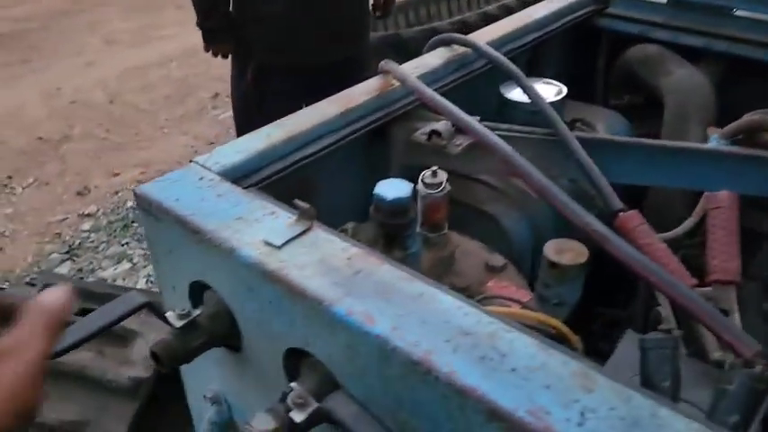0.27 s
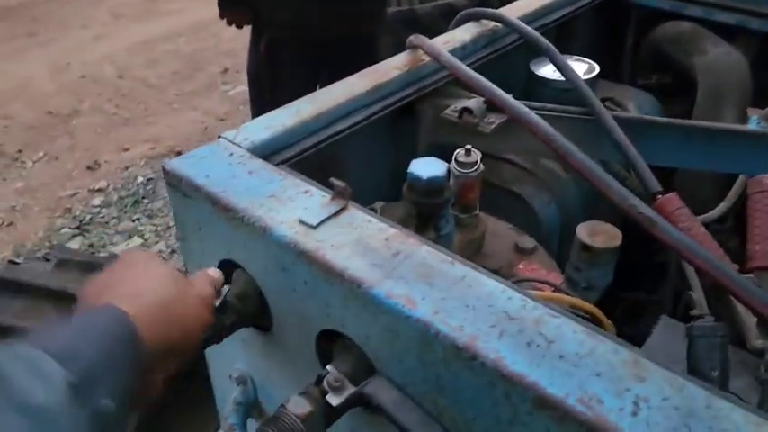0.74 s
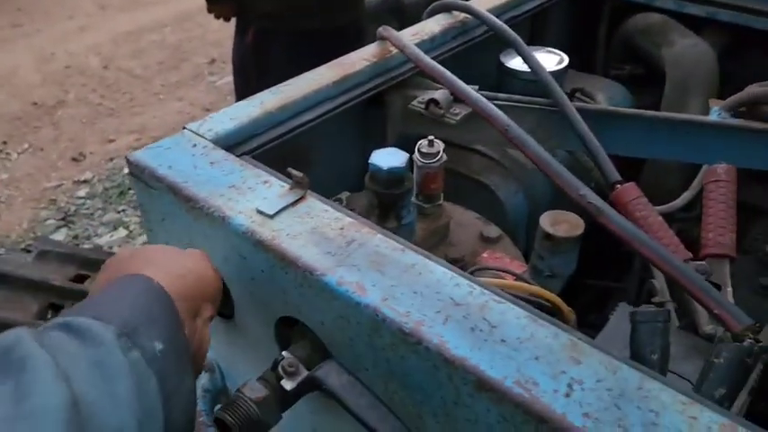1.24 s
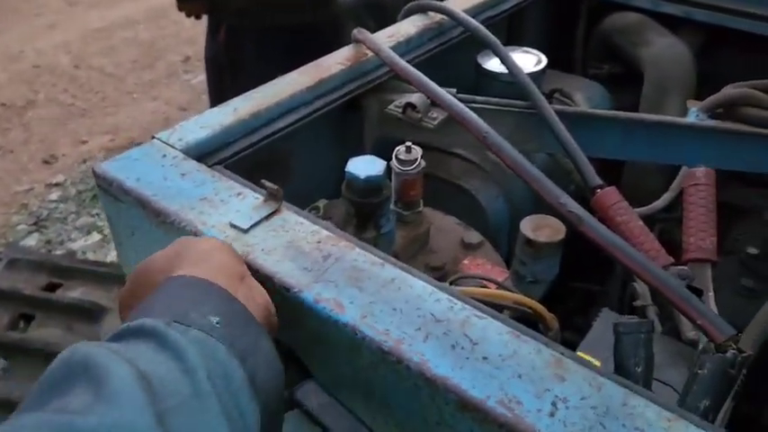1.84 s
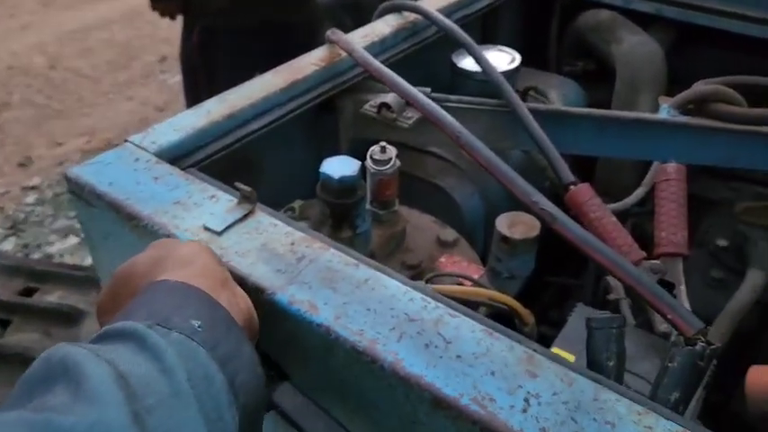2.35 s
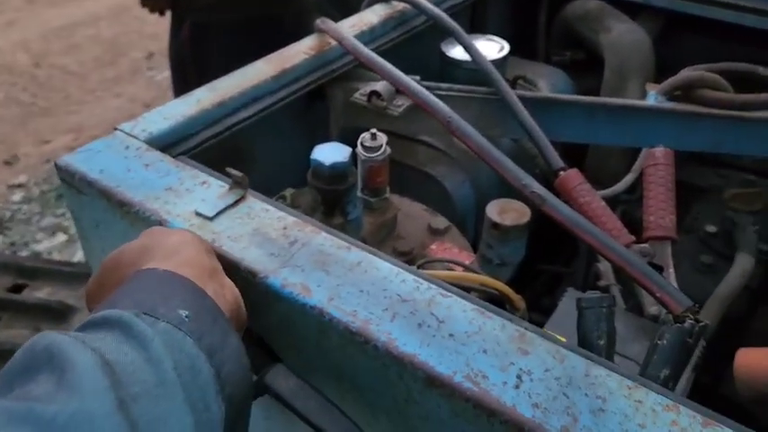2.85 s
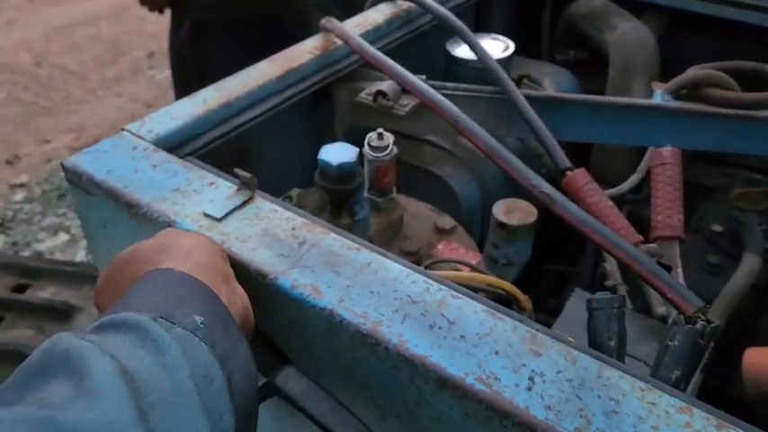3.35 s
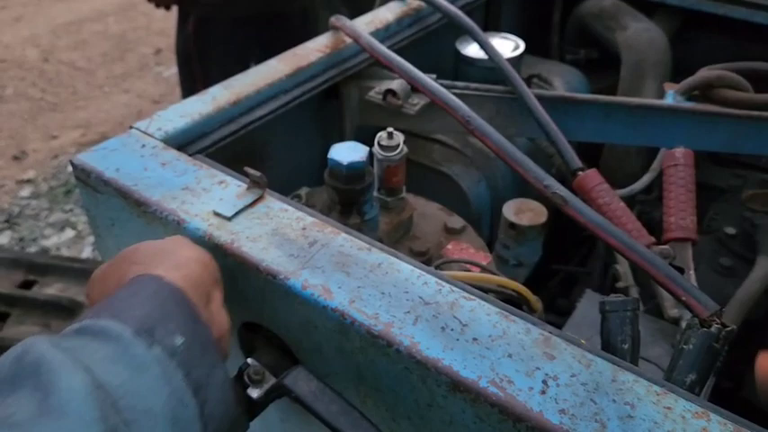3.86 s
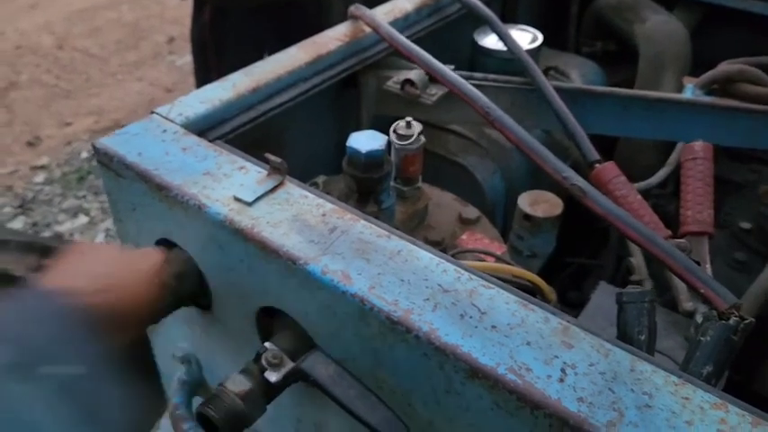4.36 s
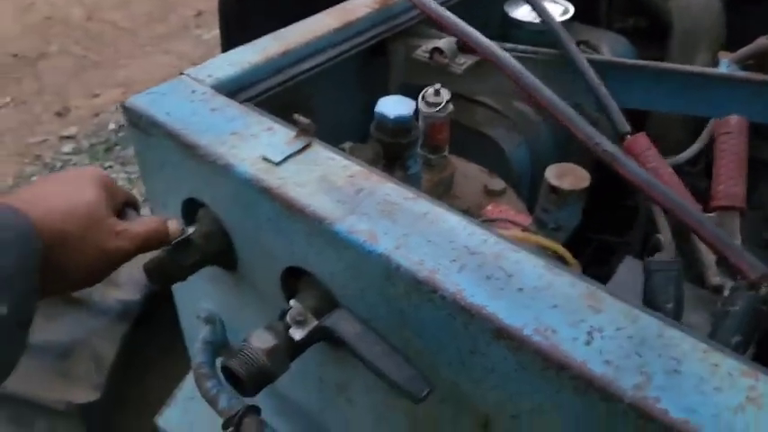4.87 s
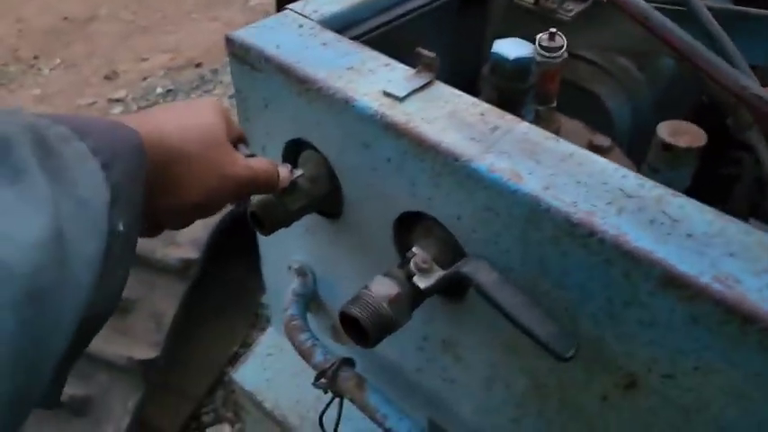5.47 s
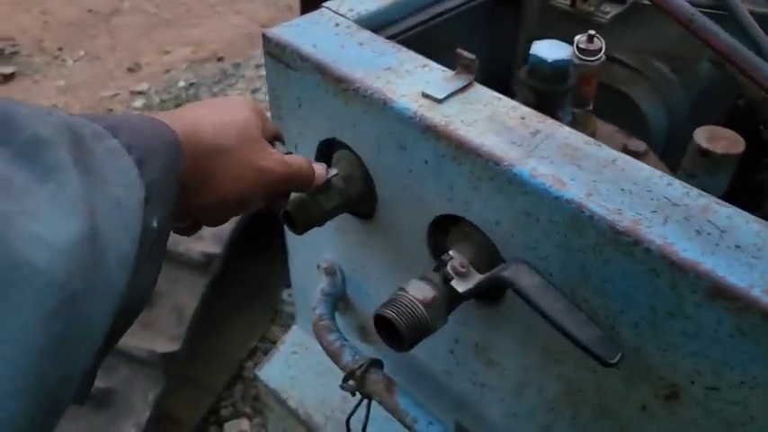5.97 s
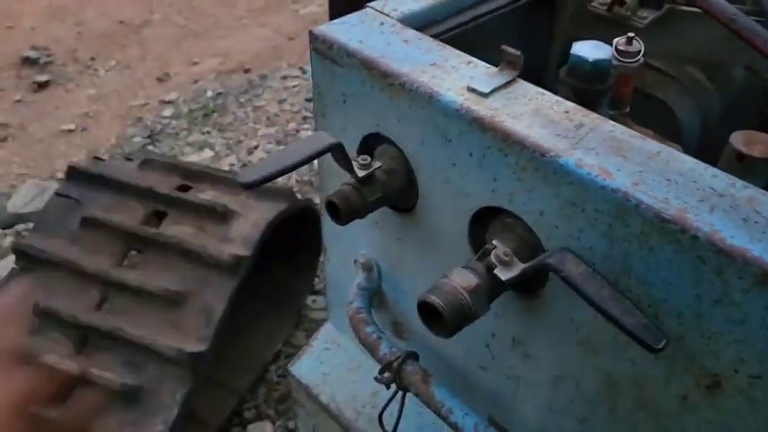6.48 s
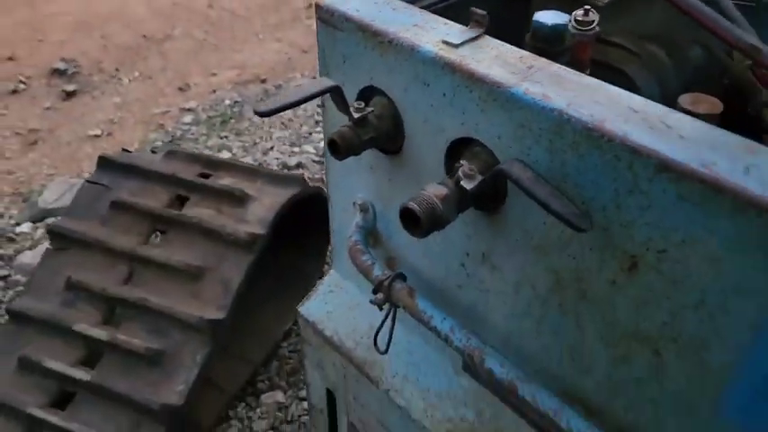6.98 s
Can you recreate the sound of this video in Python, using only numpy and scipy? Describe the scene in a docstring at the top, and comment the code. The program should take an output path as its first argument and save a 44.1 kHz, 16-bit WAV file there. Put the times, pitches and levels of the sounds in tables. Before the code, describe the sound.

A three-cylinder diesel drones through a ringing exhaust, with loud air hissing from an outlet and thumping over the nearby stereo microphone. The hiss closes off, leaving the motor sagging towards a stall amid rhythmic spurts of relief air. Air bursts out again with rasps and brief gliding tones, narrowing to a high wavering whistle as the engine revs back up outdoors.

```python
"""A three-cylinder diesel drives a portable air compressor, close by, while a hand works its outlet valve.
Each firing puffs through a ringing exhaust pipe; panels, housing and block add noise that swells with it.
Air rushes out as coloured noise; the valve shuts, the engine sags and a relief valve spits with each stroke.
The valve opens again and blasts the microphone with thumps and rasps, among short gliding tones.
Then it whistles half shut, a wavering tone in a breathy band, while the engine picks up."""
import sys
import numpy as np
from scipy import signal
from scipy.fft import rfft, irfft, next_fast_len
from scipy.io import wavfile
from scipy.ndimage import uniform_filter1d, map_coordinates

SR = 44100
rng = np.random.default_rng(int(sys.argv[2]) if len(sys.argv) > 2 else 0)


def master(y):
    """Save y as 16-bit WAV."""
    cut = np.clip(np.atleast_2d(y).T, -1, 1)
    pcm = np.round(cut * 32767)  # scale
    wavfile.write(sys.argv[1], SR, pcm.astype(np.int16))


N = 318402

# likeness of the left and right ports in the hiss: f/Hz, likeness/1
AIR_ALIKE = [(300, 0.23), (1300, 0.12), (3000, 0.11), (7000, 0.24), (14000, 0.083)]
# likeness of the two ports in the wind: f/Hz, likeness/1
WIND_ALIKE = [(60, 0.97), (160, 0.39), (300, 0.15), (1000, 0.31)]
# colour of the jet rasping over the microphone: f/Hz, level per Hz/dB
RASP = [(200, -23), (600, 3.5), (1400, 5.5), (2200, 4), (3500, -55), (9000, -40)]
# spells of venting (wide open, opened again, half shut, half shut as the hand lets go):
# opening t/s, shutting t/s, closing time/s, throat level/dB, fizz level at the start/dB
SPELLS = [(-.05, 1.472, 0.075, -22.5, -18), (4.007, 4.976, 0.022, -25.5, -19.5),
          (4.985, 6.54, 0.021, -35, -36.5), (6.53, 11, 0.037, -31, -25)]
STROKES_PER_FIRING = 2 / 3  # compressor strokes
PORTS = np.array([[-.5], [.5]])  # shares a right-minus-left difference between left and right


def amp(db):
    """Amplitude of a level in dB."""
    return 10 ** (np.asarray(db) / 20)


def unit(x):
    """x scaled to rms 1."""
    return x / np.sqrt(np.mean(x ** 2) + 1e-20)


def clock():
    """The time of every sample in s."""
    return np.arange(N) / SR


def along(points, hz):
    """Values read from (Hz, value) points on a log axis."""
    f, v = np.transpose(points)
    return np.interp(np.log(hz + 1), np.log(f + 1), v)


def curves(rows):
    """One value per sample for each column after the time."""
    s, *cols = np.transpose(rows)
    return [np.interp(clock(), s, c) for c in cols]


def steps(rows, glide_s):
    """Each row holds from its start until the next, with a short glide between them."""
    s, *cols = np.transpose(rows)
    row = np.maximum(np.searchsorted(s, clock(), side="right") - 1, 0)
    return [uniform_filter1d(c[row], int(glide_s * SR) + 1, mode="nearest") for c in cols]


def window(start, end, edge):
    """1 between two times, with soft edges; its square has straight ramps."""
    return np.sqrt(np.clip(np.minimum(clock() - start, end - clock()) / edge + .5, 0, 1))


def wobble(rate):
    """A smooth random curve, rate knots a second."""
    return map_coordinates(rng.standard_normal(int(N * rate / SR) + 4), [clock() * rate], order=2)


def filtered(x, response):
    """x times a response of frequency."""
    m = next_fast_len(N + 8192)
    return irfft(rfft(x, m) * response(np.fft.rfftfreq(m, 1 / SR)), m)[..., :N]


def rush(spectrum, alike, lead_s=0):
    """Stereo noise of rms 1 with a given colour, left-right likeness and lead at the left port."""
    def response(hz):
        turn = np.arccos(np.clip(along(alike, hz), -1, 1)) / 2
        return amp(along(spectrum, hz)) * np.array([np.cos(turn), np.sin(turn)])
    mid, side = filtered(rng.standard_normal((2, N)), response)
    right = np.roll(mid - side, int(round(lead_s * SR)))
    return unit(np.array([mid + side, right]))


def narrow(hz, width_hz):
    """A breathy stereo tone of rms 1: a narrow band of noise around a steady or gliding pitch."""
    a, b = filtered(rng.standard_normal((2, 2, N)), lambda f: 1 / (1 + (f / width_hz) ** 2))
    phase = 2 * np.pi * np.cumsum(hz * np.ones(N)) / SR
    return unit(a * np.cos(phase) + b * np.sin(phase))


def speed():
    """Firings a second: the engine runs, coasts down, sags to a crawl and picks up along an S-curve."""
    # coasting down, caught by the governor, then sagging: t/s, firing rate/Hz
    slowing_down = [(1.85, 71.4), (2.1, 70.7), (2.2, 66.5), (2.37, 59.4), (2.75, 35.4), (2.87, 30.2),
                    (3.06, 30.2), (4.04, 19.1)]
    steepest_s, time_constant_s, heads_for_hz = 6.044, .577, 78.9
    slowing, = curves(slowing_down)
    pickup = np.exp(-np.exp((steepest_s - clock()) / time_constant_s))
    return slowing + (heads_for_hz - slowing_down[-1][1]) * pickup


def pipe(hz):
    """Complex response of the exhaust's resonances and the silencer's dead notes."""
    # ringing of exhaust pipe and silencer: f/Hz, width/Hz, level/dB
    resonances = [(54.2, 15.6, 3), (117.4, 9.6, 4.5), (154.4, 14, -4.5), (181.8, 18.4, -3),
                  (212.6, 12, -3.5), (251, 8.9, -3), (283.6, 6, -3.5), (308, 14, -8), (361.5, 31, -6)]
    # dead notes of the silencer: f/Hz, width/Hz, depth/1
    dead_notes = [(87.3, 18, 0.35)]

    def peak(centre, width):
        return 1j * hz * width / (centre * centre - hz * hz + 1j * hz * width)

    # neighbouring resonances have opposite signs
    ringing = sum((-1) ** k * amp(db) * peak(c, w) for k, (c, w, db) in enumerate(resonances))
    return ringing * np.prod([1 - np.clip(depth, 0, 1) * peak(c, w) for c, w, depth in dead_notes], axis=0)


def exhaust(rate, firings, boom_db, puff_db, uneven_db):
    """One puff per firing rings the pipe; a puff lasts a fixed crank angle, so slow running is duller."""
    boom_knee_hz = 53.2  # below this firing rate the boom falls away
    dullest_hz = 147  # the slowest puffs still reach up to here
    grid = np.arange(2048)  # Hz
    # the silencer's chambers delay the higher notes and smear each puff
    response = pipe(grid) * np.exp(-1j * (grid / 130) ** 2)
    turn = np.exp(2j * np.pi * (firings + 0.0022 * wobble(30)))
    puffs, power, partial = np.zeros(N), np.zeros(N), turn
    corner = np.maximum(4.22 * rate, dullest_hz)
    # harmonics of the firing rate; the first is the boom
    for k in range(2, 18):
        partial = partial * turn
        gain = response[(k * rate).astype(int)] / (1 + (k * rate / corner) ** 5.1)
        puffs += (gain * partial).real
        power += abs(gain) ** 2
    # the three cylinders are not equally strong
    uneven = amp(uneven_db * np.cos(np.pi * firings * STROKES_PER_FIRING) + 0.45 * wobble(35))
    radiated = 1 / np.sqrt(1 + (boom_knee_hz / rate) ** 8)
    boom_level = radiated * amp(boom_db + 0.22 * wobble(18.0))
    boom = boom_level * np.sqrt(2) * (turn * np.exp(1j * 0.27)).real
    return amp(puff_db) * uneven * puffs / np.sqrt(power / 2) + boom


def casing(rate, firings, rumble_db, shudder_db, clatter_db):
    """Panels rumble, housing shudders, block clatters: noise swelling at each firing, deepest when slow."""
    # colours of panels, loose housing and block: f/Hz, level per Hz/dB
    panel_colour, housing_colour, block_colour = [(20, -30), (36, -11), (55, 1), (100, -1), (190, 0.5),
                                                  (300, -4), (400, -2.5), (520, -16.5), (900, -18.5),
                                                  (2000, -58)], [(25, -25), (55, -0.5), (100, 1.5),
                                                                  (140, -3.5), (190, -5), (250, -7.5),
                                                                  (450, -23.5), (900, -55)], [(200, -33), (440, 1),
                                                                                   (500, -23), (550, 1),
                                                                                   (610, -4), (700, -3.5),
                                                                                   (820, 6), (880, -3.5),
                                                                                   (940, 2.5), (1100, -2),
                                                                                   (1500, -7.5),
                                                                                   (2100, -10.5),
                                                                                   (4200, -14.5),
                                                                                   (14000, -20.5)]
    # likeness of the two ports: f/Hz, likeness/1
    engine_alike = [(60, 0.76), (150, 0.95), (300, 0.99), (700, 0.85), (1500, 0.13), (4000, 0.062)]
    beat = np.cos(2 * np.pi * (firings - .1)) * np.interp(rate, [25, 65], [2.2, 1])
    rumble = amp(rumble_db) * unit(amp(0.62 * beat) * rush(panel_colour, engine_alike))
    shudder = amp(shudder_db) * unit(amp(0.62 * beat) * rush(housing_colour, engine_alike))
    rattle = amp(0.23 * beat + 1.4 * wobble(120))
    clatter = amp(clatter_db) * unit(rattle * rush(block_colour, engine_alike))
    return rumble + shudder + clatter


def jet(throat_db, fizz_db, sizzle_db, spectrum):
    """Escaping air: a roar in the valve's throat and fizz from the free jet, each with its own turbulence."""
    throat_right_db, fizz_right_db = 1, 0.3  # right port minus left
    air = rush(spectrum, AIR_ALIKE, lead_s=.0003)
    throat = filtered(air, lambda hz: 1 / (1 + (hz / 4600) ** 8))
    sizzle = air - filtered(air, lambda hz: 1 / (1 + (hz / 10500) ** 8))
    fizz = (air - throat + (amp(sizzle_db) - 1) * sizzle) / np.std(air - throat)

    def eddies_db():
        return 0.99 * (wobble(250) + 1.48 * wobble(30))

    roar = amp(throat_db + PORTS * throat_right_db + eddies_db()) * unit(throat)
    return roar + amp(fizz_db + PORTS * fizz_right_db + eddies_db()) * fizz


def outlet(rate, strokes):
    """Each spell of venting drains the tank and grows louder with engine speed; the strokes ripple the flow."""
    # air wide open, opened again, half shut, let go: f/Hz, level per Hz/dB
    colours = [[(200, -7), (700, -9.5), (1500, -7.5), (1950, -9.5), (2400, -0.5), (3100, -2.5), (3900, -4),
                (5700, 5), (6600, -2), (7450, 5), (8300, 2), (10700, -0.5), (11800, 5.5), (14200, 2)], [(200, -5), (700, -1), (1500, -2), (1950, -6.5), (2350, 1.5), (3200, 4.5),
                                   (4200, 1), (6000, 0), (6900, -3), (7550, 0.5), (8300, -3.5), (10200, -5),
                                   (12300, 0), (14200, 0)], [(300, -45), (1000, -9), (1500, -5), (1850, -7.5),
                                                       (2350, 4.5), (2700, -0.5), (3200, 2), (4200, -5.5),
                                                       (5400, 8.5), (6900, 0), (7600, 2.5), (8400, 1),
                                                       (10900, -1), (12000, -4)], [(300, -1), (1000, -15),
                                                                              (1500, -1.5), (1850, -5),
                                                                              (2350, 6), (2700, 1.5),
                                                                              (3200, 2), (4200, -15),
                                                                              (5400, 5.5), (6900, -4),
                                                                              (8400, -0.5), (10000, -5.5),
                                                                              (12000, -2.5), (14000, 0)]]
    # the hiss swells as the jet points at the microphone: start t/s, end t/s, edge/s, level/dB
    sweeps = [(0.76, 0.995, 0.08, 2), (4.394, 4.477, 0.014, 8.5)]
    bleed_db_per_s = 0.76  # an open outlet drains the tank
    # a faster engine pumps more air: dB per octave of engine speed
    throat_slope, fizz_slope, sizzle_slope = 5, 8.5, -4
    throat_fade = 0.53  # share of the fizz's closing loss in dB that the throat takes
    t, air = clock(), 0
    for (opens, shuts, closing, throat_db, fizz_db), colour in zip(SPELLS, colours):
        shut_db = -20 / np.log(10) * np.logaddexp(0, 2 * (t - shuts) / closing)
        octaves = np.log2(rate / np.interp(opens, t, rate))
        sizzle_db = sizzle_slope * np.log2(rate / np.interp(shuts, t, rate))
        flow = jet(throat_db + throat_slope * octaves + throat_fade * shut_db,
                   fizz_db + fizz_slope * octaves + shut_db, sizzle_db, colour)
        air = air + window(opens, np.inf, edge=0.0052) * amp(-bleed_db_per_s * (t - opens)) * flow
    aim_db = sum(db * window(start, end, edge) ** 2 for start, end, edge, db in sweeps)
    return amp(aim_db + 0.099 * np.cos(2 * np.pi * strokes)) * air


def swells():
    """Bands of noise swell and slide in the hiss as hand and microphone move about the jet."""
    # start t/s, end t/s, f at start/Hz, f at end/Hz, width/Hz, level/dB
    bands = [(-.05, 0.493, 7430, 7500, 450, -26.5), (0.761, 1.198, 12430, 11800, 695, -28),
             (4.007, 4.39, 3520, 3204, 593, -33), (4.395, 4.47, 4780, 1800, 1000, -25),
             (4.467, 4.714, 2287, 2345, 336, -28), (4.72, 4.921, 1510, 1256, 402, -33)]
    sound = 0
    for start, end, from_hz, to_hz, width_hz, db in bands:
        hz = np.interp(clock(), [start, end], [from_hz, to_hz])
        gate = window(start, end, edge=min(.12, (end - start) / 4))
        sound = sound + amp(db) * gate * narrow(hz, width_hz)
    return sound


def leak():
    """Strength of air at the relief valve while the outlet is shut: it weeps, cracks open, pops and fades."""
    weep_s, weep_width_s, weep_db = 2.19, 0.3, -33.5
    crack_s, lift_s, lift_db, fade_db_per_s = 2.3, 3.001, -22, 3
    crack_share = 0.65  # how far it has opened just before it lifts fully
    pop_db, pop_length_s = 1.5, 0.086
    reseat_db, reseat_s = -4, 0.029  # after the pop it falls back for a moment
    t = clock()
    weep = amp(weep_db) / (1 + ((t - weep_s) / weep_width_s) ** 2)
    spent = lift_s + pop_length_s
    pop = pop_db * window(lift_s, spent, edge=0.011) ** 2
    reseat = reseat_db * window(spent, spent + reseat_s, edge=0.01) ** 2
    cracking = crack_share * np.clip((t - crack_s) / (lift_s - crack_s), 0, 1) ** 1.6
    opening = np.where(t < lift_s, cracking, 1)
    lifted = amp(lift_db + pop + reseat - fade_db_per_s * (t - lift_s)) * opening
    return np.maximum(weep, lifted) * window(SPELLS[0][1], SPELLS[1][0], edge=0.074)


def relief(rate, strokes):
    """Each stroke lifts the relief valve, which chatters on its seat and closes again, now sooner, now later."""
    # slow strokes come as separate spits: firing rate/Hz, share of the leak in spits/1
    spit_shares = [(20, 0.91), (30, 0.45), (55, 0.17)]
    # colour of the relief air: f/Hz, level per Hz/dB
    relief_colour = [(900, -31), (2200, -16.5), (3000, -3), (3900, -12.5), (5000, -4), (5580, -2.5),
                     (5850, 1), (6100, -0.5), (6650, -3), (7250, 2.5), (7580, 6), (8000, -6), (10700, -9),
                     (11800, -5.5), (13900, -3.5)]
    chatter_hz, shuts_at = 84, 0.94  # shuts at about this share of the stroke
    part = strokes % 1
    age = part / (rate * STROKES_PER_FIRING)  # s since the stroke began
    closes = np.minimum(shuts_at + .045 * wobble(17), 1)
    lift = np.minimum(age / .0015, 1) * np.exp(-.85 * part) * np.clip((closes - part) / .2, 0, 1)
    cycle = chatter_hz * age - .2 + 0.48 * part * wobble(40)
    chatter = amp(4.8 * np.cos(2 * np.pi * cycle) + .8 * wobble(90))
    share = np.clip(along(spit_shares, rate), 0, 1)
    flow = 1 - share + share * unit(lift * chatter)
    return leak() * flow * rush(relief_colour, AIR_ALIKE, lead_s=-.00012)


def housing(x):
    """Echoes off nearby steel walls comb the hiss, differently at each port."""
    # delay left/s, delay right/s, gain/1
    walls = [(.0013, 0.0018, 0.093), (.0031, 0.0018, -0.11), (.0052, 0.0066, 0.056), (.0094, 0.0098, 0.011)]

    def response(hz):
        echoes = 0
        for left, right, gain in walls:
            echoes = echoes + gain * np.exp(-2j * np.pi * hz * np.array([[left], [right]]))
        return 1 + echoes

    return filtered(x, response)


def whistle(strokes):
    """Half-shut valve: a stroke-wavered edge tone with a weak octave, in a halo and a wider skirt of noise."""
    # t/s, f/Hz, level/dB, right minus left/dB, phase between the ports/rad
    edge_tone = [(5.0, 5430, -18, 0, 0.72), (5.3, 5310, -24.5, -1, 1.7), (5.5, 5190, -26.5, 0, 2.34),
                 (5.7, 5120, -33, -2, 2.3), (6.0, 5120, -25.5, 1.5, 2.8), (6.35, 5250, -19.5, 9.5, 3.4),
                 (6.63, 5373, -12.5, 7, 2.5), (6.8, 5520, -13, -1, 2.63), (6.98, 5550, -18.5, 5, 1.8),
                 (7.22, 5960, -26, -5, 1.5)]
    # the tone breaks and jumps up: t/s, length/s, jump/Hz, dip/dB
    breaks = [(6.535, 0.03, 19, -11), (6.804, 0.018, 130, -34), (6.995, 0.021, 190, -1)]
    start, chirp_hz, chirp_s = 4.988, 260, 0.00795  # it starts sharp and falls to pitch
    # skirt: width, mean level, share of the tone's swings in dB
    skirt_width_hz, skirt_db, skirt_follows = 220, -38.5, 0.58
    t = clock()
    hz, db, right_db, spread = curves(edge_tone)
    hz = hz + chirp_hz * np.exp(-np.maximum(t - start, 0) / chirp_s)
    for s, length, jump_hz, dip_db in breaks:
        hz = hz + jump_hz * window(s, np.inf, length) ** 2
        db = db + dip_db * window(s - length / 2, s + length / 2, edge=0.0092) ** 2
    ripple = np.cos(2 * np.pi * strokes)
    phase = 2 * np.pi * np.cumsum(hz + 12 * ripple + 13 * wobble(50) + 42 * wobble(500)) / SR
    waver = unit(amp(1.04 * wobble(180) + 2.2 * wobble(25) + 0.65 * ripple))
    tone = waver * np.exp(1j * (phase + PORTS * spread))
    halo = unit(filtered(rng.standard_normal((2, N)), lambda f: 1 / (1 + (f / 170) ** 2)))
    # a strong tone locks in; a weak one is breathier
    airy = np.clip(np.interp(db, [-31, -21, -13], [.55, .08, .03]), 0, 1)
    breath = halo[0] * tone.real + halo[1] * tone.imag
    sound = np.sqrt(2 * (1 - airy)) * tone.real + np.sqrt(airy) * breath
    octave = amp(-21.5) * np.cos(2 * phase) * (0.38 + 0.66 * halo)
    skirt_level = amp(skirt_db + skirt_follows * (db - np.mean(db[t > start])))
    skirt = skirt_level * unit(amp(2.4 * ripple + 4.5 * wobble(90))) * narrow(hz, skirt_width_hz)
    return (amp(db + PORTS * right_db) * (sound + octave) + skirt) * window(start, np.inf, edge=0.0091)


def buffeting():
    """The jet batters the microphone in ragged lumps of noise and rasps over its edge."""
    # the jet strikes the microphone: start t/s, end t/s, thump level/dB, rasp level/dB
    gusts = [(0.803, 0.872, -21, -29), (0.872, 0.939, -17, -27), (0.946, 0.994, -16, -22),
             (1.045, 1.098, -43, -31), (1.076, 1.117, -41, -27), (1.137, 1.188, -27, -25.5),
             (1.226, 1.4, -23, -31.5), (4.255, 4.304, -25.5, -47), (4.289, 4.337, -16, -36),
             (4.36, 4.41, -19, -45), (4.413, 4.443, -35, -44), (4.444, 4.467, -20.5, -19),
             (4.667, 4.708, -46, -29), (6.403, 6.496, -45, -32)]
    # colour of the thumps: f/Hz, level per Hz/dB
    thump_colour = [(25, -14), (100, 10.5), (190, 0.5), (380, -1.5), (600, -7), (1050, -8.5), (1500, -27),
                    (3000, -36), (8000, -55)]
    thump = sum(amp(db) * window(start, end, edge=0.0063) for start, end, db, _ in gusts)
    rasp = sum(amp(db) * window(start, end, edge=0.013) for start, end, _, db in gusts)
    wind = thump * rush(thump_colour, WIND_ALIKE) + rasp * rush(RASP, AIR_ALIKE)
    return unit(amp(1.9 * wobble(200))) * wind


def slaps():
    """Single eddies hit the microphone: a quick push of pressure and a splash of rasp."""
    # t/s, level/dB
    eddy_hits = [(0.878, -14.5), (0.898, -17), (0.908, -5.5), (0.925, -7), (0.967, -10.5), (0.982, -14),
                 (4.294, -4), (4.322, -16), (4.337, -13), (4.398, -26), (4.442, -11), (4.449, -6)]
    push_s, splash_s, splash_db = 0.0016, 0.0026, -11.5  # push length, splash decay and relative level
    t = np.arange(2048) / SR
    push = (1 - t / push_s) * np.exp(-t / push_s) * (1 - np.exp(-t / 0.00029))
    hits = np.zeros(N)
    for s, db in eddy_hits:
        hits[int(s * SR)] = amp(db)
    splash = signal.fftconvolve(hits, np.exp(-t / splash_s))[:N]
    return signal.fftconvolve(hits, push)[:N] + amp(splash_db) * splash * rush(RASP, WIND_ALIKE)


def gliding_tones():
    """Short sines, unsteady in pitch, glide up or down around the gusts."""
    # t/s, length/s, f/Hz, level/dB, relative rise of pitch/(1/s)
    glides = [(1.047, 0.028, 300, -34, -10), (1.048, 0.038, 580, -37, -3), (1.049, 0.027, 1160, -36, -3),
              (4.305, 0.044, 1040, -25, 1), (4.325, 0.039, 188, -20.5, 1), (4.328, .06, 365, -27.5, -0.5),
              (4.363, 0.031, 1000, -30, 2), (4.513, 0.02, 300, -28.5, -2), (4.516, 0.023, 680, -36, -1),
              (4.571, 0.038, 178, -30, -2), (4.65, 0.027, 310, -33, 3), (4.677, 0.015, 545, -28, 7),
              (4.688, 0.029, 1310, -28, 1), (4.702, 0.022, 1900, -29, 4)]
    unsteady, tones = clock() + np.cumsum(0.051 * wobble(150)) / SR, 0
    for s, length, hz, db, rise in glides:
        phase = 2 * np.pi * hz * (unsteady + rise * (clock() - s) ** 2 / 2)
        gate = window(s - length / 2, s + length / 2, edge=0.0166)
        tones = tones + amp(db) * gate * np.sin(phase)
    return np.sqrt(2) * tones


def low_end_dips(x):
    """The low end of engine and air dips briefly: a low-passed copy is partly taken away."""
    # start t/s, end t/s, level/dB, reaching up to f/Hz
    dips = [(0.833, 1.388, -7, 254), (0.997, 1.075, -9, 1490), (1.094, 1.159, -19, 746),
            (1.176, 1.225, -11, 700), (4.475, 4.54, -9.5, 1060), (4.546, 4.712, -4.5, 300),
            (4.684, 4.798, -9, 700), (4.8, 4.875, -5, 300)]
    for start, end, db, top_hz in dips:
        low = signal.sosfiltfilt(signal.butter(2, top_hz, fs=SR, output="sos"), x)
        x = x + (amp(db) - 1) * window(start, end, edge=0.013) ** 2 * low
    return x


def singing():
    """Weak flow makes the valves sing faintly: narrow bands of noise."""
    # start t/s, end t/s, f/Hz, width/Hz, level/dB
    faint_tones = [(1.72, 2.2, 5673, 75, -46.5), (5.682, 5.981, 4970, 83.33, -38)]
    return sum(amp(db) * window(start, end, edge=0.2) * narrow(hz, width_hz)
               for start, end, hz, width_hz, db in faint_tones)


def scene():
    """The crankshaft times the firings and the compressor's strokes; the jet and its wind join the engine."""
    # engine running free, pumping against the shut valve, throttling back, coasting, caught by the
    # governor, labouring, chugging, sinking, near stalling, stumbling, picking up, gathering speed, back:
    # start t/s, boom level/dB, exhaust puffs level/dB, panel rumble level/dB, shudder level/dB,
    # block clatter level/dB, unevenness of the cylinders/dB
    states = [(0, -17.5, -26, -30, -38.5, -51, 0.2), (1.5, -18.5, -26.5, -29.5, -43.5, -34.5, 0.5),
              (2.18, -22, -23, -28.5, -44, -32.5, -2), (2.47, -15.5, -30, -33, -36, -37, 0),
              (2.88, -22, -18.5, -33.5, -37, -35.5, -0.5), (3.34, -18, -22, -32.5, -35, -34, 0.5),
              (3.78, -22, -20.5, -32.5, -38, -34.5, -0.5), (4.08, -22, -24, -35.5, -28.5, -54, 0),
              (4.47, -22, -37, -34, -30.5, -43, -5), (5.27, -22, -33.5, -29.5, -28, -40, 1),
              (5.62, -25, -22.5, -40.5, -28.5, -44.5, 3), (6.15, -24.5, -24, -33.5, -27.5, -41, 1.5),
              (6.7, -19, -26, -34.5, -35, -39, 0)]
    stroke_at_s = 3.5  # a stroke begins here
    puff_lag = 0.149  # each puff reaches the tailpipe this share of a firing late
    rate = speed()
    firings = np.cumsum(rate) / SR
    firings = firings - np.interp(stroke_at_s, clock(), firings)
    strokes = firings * STROKES_PER_FIRING
    boom_db, puff_db, rumble_db, shudder_db, clatter_db, uneven_db = steps(states, glide_s=0.2)
    late = firings - puff_lag
    engine = exhaust(rate, late, boom_db, puff_db, uneven_db)
    engine = engine + casing(rate, late, rumble_db, shudder_db, clatter_db)
    air = housing(outlet(rate, strokes) + swells() + relief(rate, strokes))
    at_microphone = buffeting() + slaps() + gliding_tones()
    return low_end_dips(engine + air) + whistle(strokes) + singing() + at_microphone


def record(dry):
    """The highest peaks are rounded off and nothing is kept above the band limit."""
    top_hz = 14280
    rounded = dry / (1 + (dry / .9) ** 8) ** (1 / 8)
    return filtered(rounded, lambda hz: np.clip((top_hz - hz) / 150 + .5, 0, 1))


dry = scene()
out = record(dry)
master(out)
```